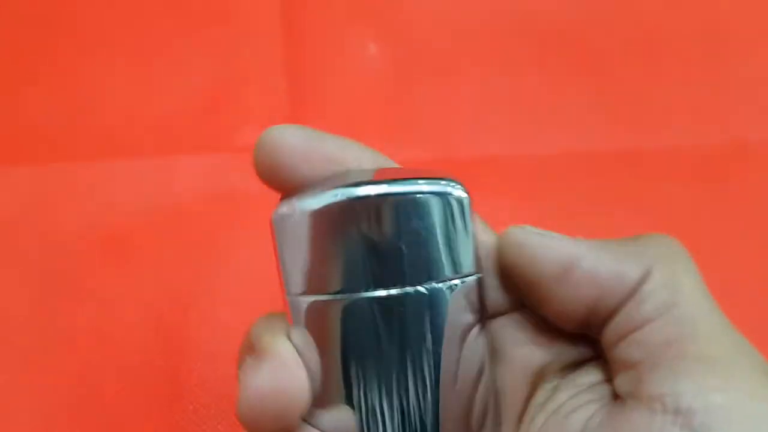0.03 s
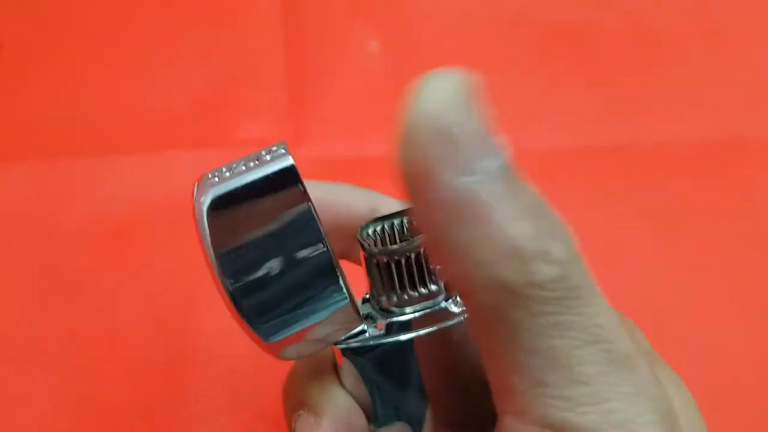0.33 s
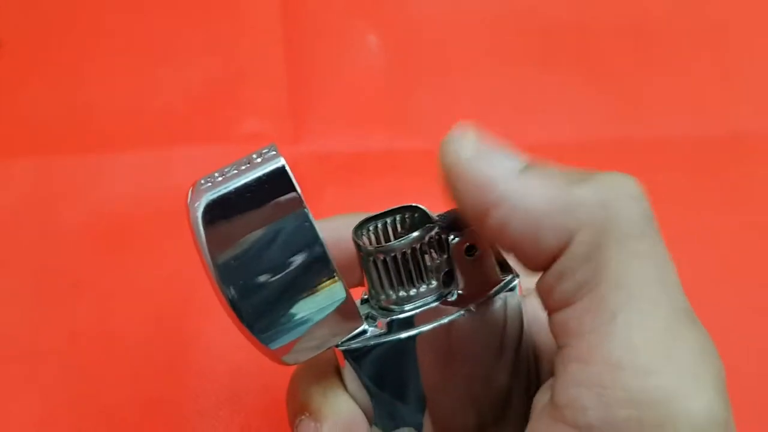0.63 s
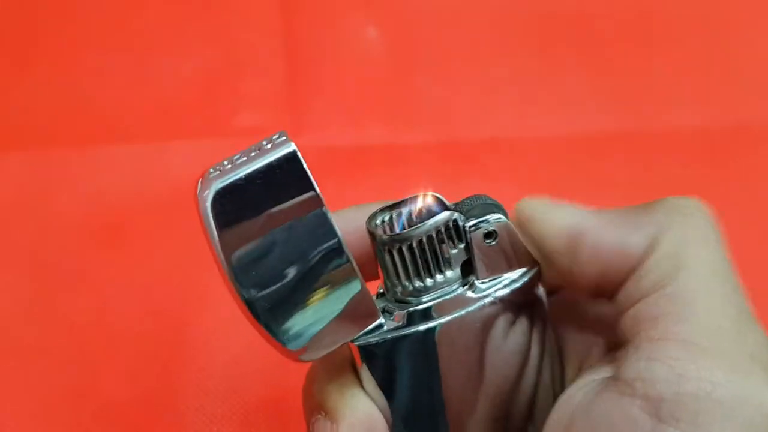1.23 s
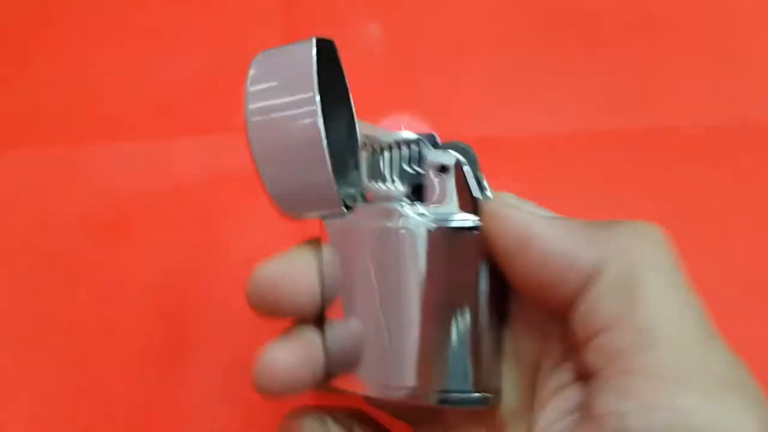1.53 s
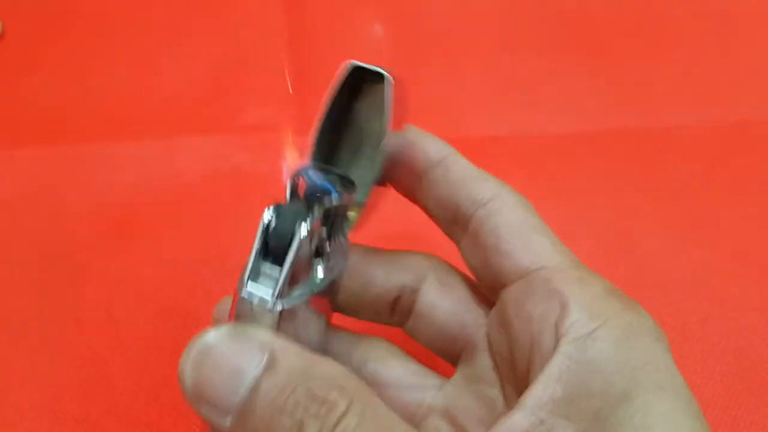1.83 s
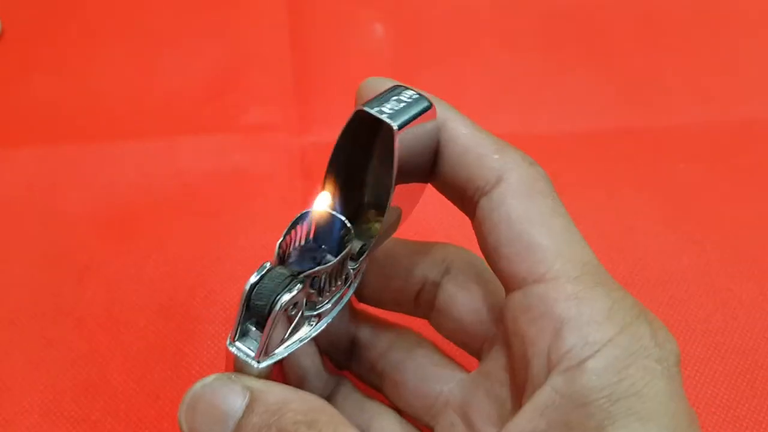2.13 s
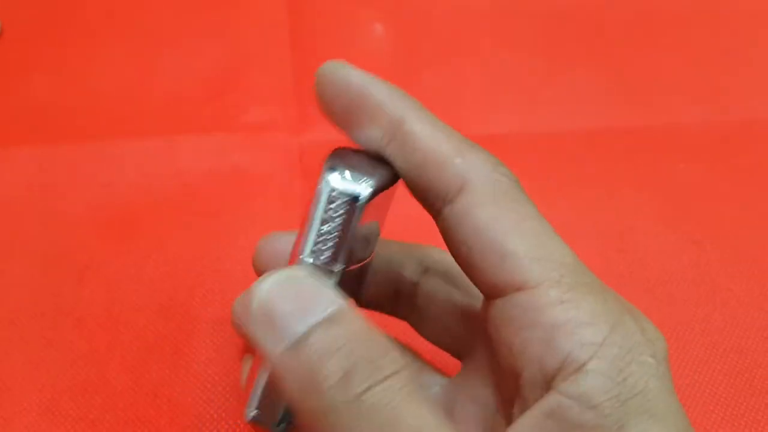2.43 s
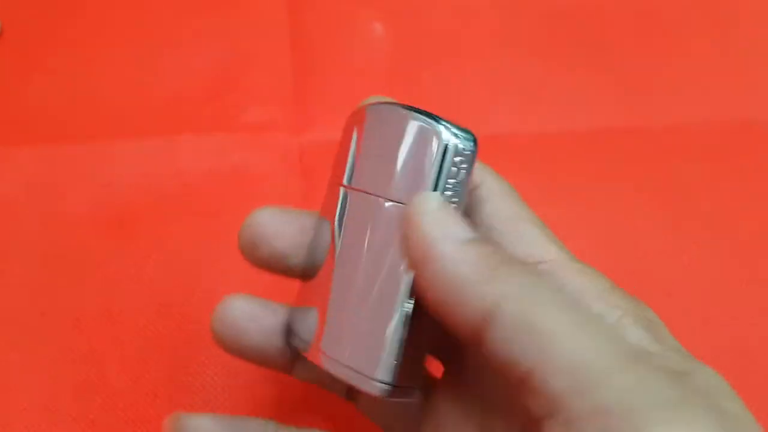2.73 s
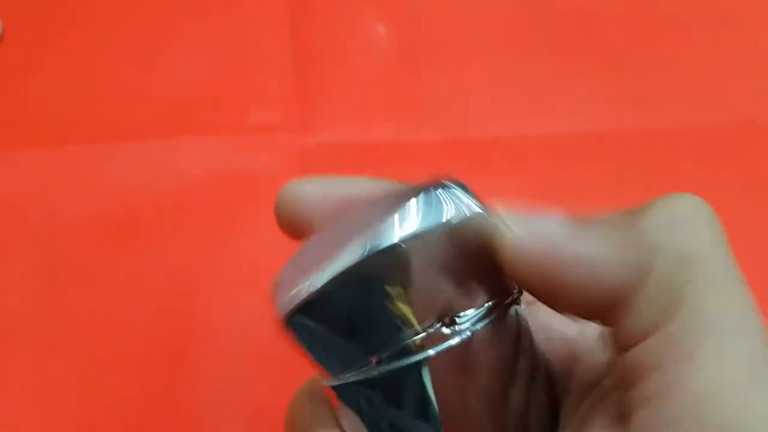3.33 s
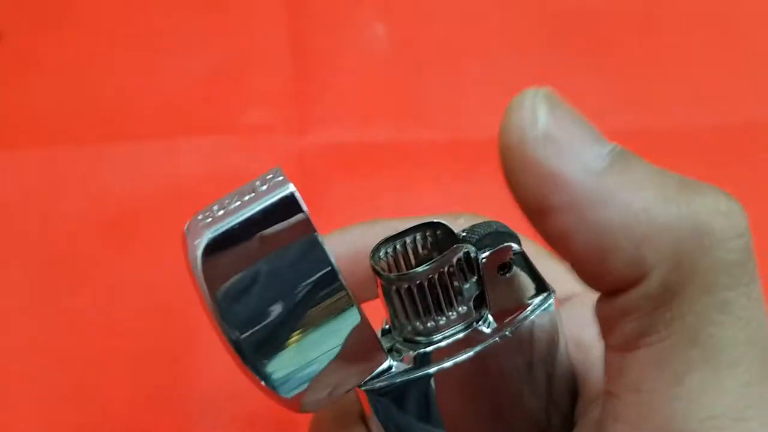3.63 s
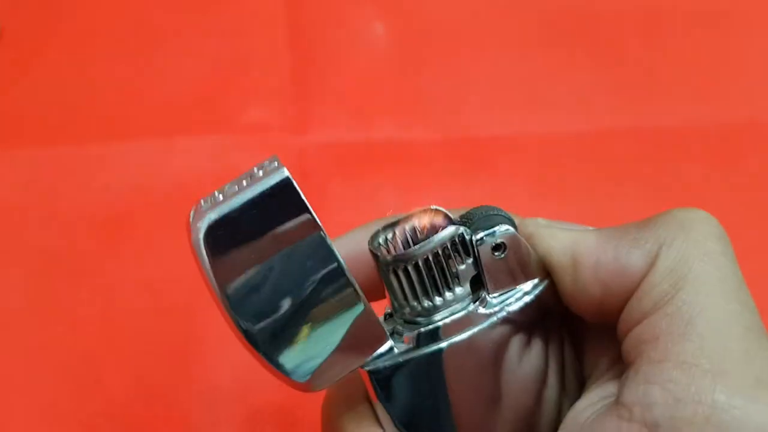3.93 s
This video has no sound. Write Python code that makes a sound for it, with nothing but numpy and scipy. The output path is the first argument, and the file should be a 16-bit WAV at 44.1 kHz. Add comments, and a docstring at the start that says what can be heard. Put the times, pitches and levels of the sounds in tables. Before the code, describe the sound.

A metal lighter clinks open, is struck, snaps shut, then is opened and struck again.

```python
"""A metal lighter, handled close to the left microphone in a small, humming room.
At 0.3 s the lid clinks open, shell ringing and cam rattling; at 0.8 s the wheel rasps on the flint.
A faint whine passes far off and fingers rub the case while the recorder's gain creeps up, lifting
the room's rumble, hum and hiss. At 2.3 s the lid snaps shut into the limiter and the gain ducks.
At 3.5 s the lid opens again; at 3.8 s the wheel is struck harder, and the distant whine returns."""
import sys
import numpy as np
from scipy import signal
from scipy.fft import rfft, irfft
from scipy.io import wavfile
from scipy.ndimage import uniform_filter1d, minimum_filter1d

SR = 44100
rng = np.random.default_rng(int(sys.argv[2]) if len(sys.argv) > 2 else 0)


def output_pcm(signal):
    """Save a mono or channel-first signal as 16-bit PCM at the path in sys.argv[1].

    Samples are clipped to [-1, 1] before scaling.
    """
    pcm = np.clip(np.atleast_2d(signal).T, -1, 1) * 32767
    wavfile.write(sys.argv[1], SR, np.round(pcm).astype(np.int16))


N = 176400

# The lid slams on the case and bounces. Each row: start in seconds, level in dB.
LID_BLOWS = [(2.3325, 23.5), (2.3349, 11), (2.336, 11)]
# Colour of the closed case. Each row: frequency in Hz, relative level in dB.
CASE_COLOUR = [(200, -29), (1500, -29.5), (2700, -31.5), (4000, -29), (5500, -16.5), (6700, -22),
               (7600, -21), (9000, -18), (10400, -16.5), (11000, -15), (11600, -6.5), (12500, -3),
               (13300, 0), (13950, -33), (14400, -4.5), (15200, -28), (16000, -40)]
# The lid flips open. Each row: start in seconds, level in dB, ring against rattle in dB.
LID_FLIPS = [(0.3176, -7, -2.5), (3.465, -3.5, 3)]
# Modes of the open lid and case. Each row: frequency in Hz, level in dB, t60 in seconds.
LID_MODES = [(1588, -42, 0.074), (2700, -41, .05), (3146, -21, 0.074), (3494, -17, .055), (4560, -15, .025),
             (4820, -23.5, 0.05), (5060, -30.5, .03), (6120, -16.5, 0.035), (7680, -26, 0.033),
             (8790, -24, .05), (10800, -30.5, 0.07), (11660, -16, 0.077), (12000, -31, .16),
             (12285, -15.5, 0.071), (12800, -33, 0.17), (12810, -21, 0.1), (15115, -22.5, 0.083)]
# Colour of the sprung cam's rattle. Each row: frequency in Hz, relative level in dB.
CAM_COLOUR = [(200, -19.5), (1100, -36), (1450, -8), (2100, -11.5), (3300, 5), (3950, -10.5), (4700, -2.5),
              (5900, -4.5), (6700, -14.5), (7500, 1.5), (8100, -17), (8700, -6), (10200, -12), (11200, -34),
              (12150, 11), (13700, -13), (15100, -6.5), (16000, -35)]
# Strokes of the flint wheel. Each row: peak time, rise and fall in seconds, level in dB.
WHEEL_STROKES = [(0.771, 0.0071, 0.0077, -25.5), (3.7948, 0.0041, 0.005, -15.5),
                 (3.835, 0.0015, 0.00091, -17.5)]
# Single teeth catch on the flint. Each row: start in seconds, level in dB.
TOOTH_CATCHES = [(0.7428, -55), (0.758, -29), (0.7648, -29), (0.7706, -34), (0.778, -21), (0.7852, -31),
                 (0.8013, -38.5), (3.7928, -11.5), (3.7972, -9), (3.8021, -12), (3.8088, -22),
                 (3.8158, -23)]
# Colour of the flint. Each row: frequency in Hz, relative level in dB.
FLINT_COLOUR = [(300, -20), (1300, -23), (2500, -16), (4400, -19), (5700, -6), (7000, -10), (8600, -0.5),
                (10000, -4), (11800, 3), (12900, -4.5), (14100, -2), (15300, -14), (16000, -31)]
# The thumb nudges the lid. Each row: start in seconds, level in dB.
THUMB_NUDGES = [(0.2382, -54), (0.2455, -51), (0.2478, -42.5), (3.357, -42.5), (3.3685, -50), (3.374, -48),
                (3.384, -51)]
# Colour of the lid shifting on its catch. Each row: frequency in Hz, relative level in dB.
CATCH_COLOUR = [(1000, -26.5), (5000, -29.5), (9000, -16.5), (11500, -17.5), (12300, -2), (12850, 3),
                (13600, -14), (15500, -23)]
# The hinge creaks. Each row: start and length in seconds, pitch in Hz, level in dB.
HINGE_CREAKS = [(0.231, 0.013, 1800, -55), (0.277, .008, 5200, -56), (2.3203, 0.0045, 3100, -31),
                (2.323, .005, 5000, -44), (3.358, 0.0066, 1800, -33.5)]
# Fingers rub the case. Each row: start and length in seconds, centre and width in Hz, level in dB.
FINGER_RUBS = [(0.192, .04, 4620, 2000, -71.5), (1.413, 0.077, 7400, 3000, -74),
               (1.703, 0.19, 6320, 250, -66), (1.757, 0.066, 6600, 3000, -63),
               (2.212, 0.029, 6490, 1000, -47)]

# Colour of the room noise. Each row: frequency in Hz, relative level in dB.
AIR_COLOUR = [(20, -15), (34, -7.5), (48, 3), (70, 5), (90, -7), (140, -2.5), (190, -1.5), (250, -7.5),
              (400, -9.5), (600, -12), (900, -11), (1400, -21), (2000, -22.5), (3200, -25.5), (4500, -28),
              (6000, -29.5), (7300, -38.5), (8400, -40.5), (9800, -37.5), (13500, -39), (15500, -47)]
# How alike that noise is at the two microphones. Each row: frequency in Hz, correlation.
AIR_CORRELATION = [(35, 0.91), (70, 1), (150, 0.88), (350, 0.77), (700, 0.38), (1500, 0.067),
                   (10000, 0.061)]
# Its lean to the left microphone. Each row: frequency in Hz, left minus right in dB.
AIR_BALANCE = [(50, 1.5), (400, 0), (1200, 0.5), (4000, 4), (7000, 6.5), (10000, 10), (15000, 5)]
# The recorder's gain on the room noise, a set curve that creeps up and ducks at the snap.
# Each row: time in seconds, then gain of rumble, bass, middle and treble in dB.
RECORDER_GAIN = [(0, -14, -10, -12, -17), (.45, -11, -9.5, -10.5, -13), (.7, -17, -2.5, -10, -11.5),
                 (1.43, -9, -3.5, -6.5, -12), (1.49, 2.5, 0.5, -4.5, -7.5), (1.83, 1, 2, 5, 2),
                 (2.05, 10, 9.5, 8.5, 5), (2.312, 10, 14.5, 13, 11), (2.37, 0, -3, 2, -2),
                 (2.62, -6, 0.5, 1.5, -1), (2.75, -7, 4.5, 3, 0.5), (2.82, 0, 0, 3.5, 1),
                 (3.15, -3, 1, 2.5, 4), (3.7, 1, 0, 3.5, 2), (4, 4.5, 0.5, 2.5, -0.5)]
# Centres of rumble, bass, middle and treble in Hz.
BAND_CENTRES = [60, 140, 650, 3500]
# A machine hums in the room. Each row: pitch in Hz, first and last level in dB before the gain.
HUM_TONES = [(55.4, -58, -53), (92.7, -50, -61.5), (115.8, -50.5, -51), (136.8, -43.5, -56),
             (187.5, -54, -55), (394, -62.5, -69), (836, -70.5, -67), (991, -77, -71.5)]
# A faint whine far off. Each row: start and length in seconds, pitch in Hz, level in dB.
WHINE_TONES = [(0.852, 0.63, 1975, -78), (0.901, .5, 1585, -78), (1.05, 0.42, 1180, -75),
               (3.89, 0.15, 1975, -62), (3.888, .2, 1585, -64)]
# Decay of the room. Each row: frequency in Hz, t60 in seconds.
ROOM_DECAY = [(300, 0.27), (3000, 0.81), (5500, .72), (8000, 0.72), (12000, 0.49), (15500, 0.51)]
# Colour of the reverberation. Each row: frequency in Hz, relative level in dB.
TAIL_COLOUR = [(1000, 7), (3300, 0), (5500, -1), (9000, -3), (12200, 1), (15000, 3)]
# Early echoes. Each row: delay in seconds, level against the tail in dB.
EARLY_ECHOES = [(.0125, -8.5), (.0138, -13), (.0252, -7), (.0278, -13)]


def lid_shuts(spread_s=0.0011):
    """The lid hits the rim and bounces; the closed case answers with a bright, short crack."""
    t = np.arange(0, spread_s, 1 / SR)
    # The thin shell spreads each blow in time, low notes first.
    sweep = np.cos(np.pi * SR / 2 * t ** 2 / spread_s)
    blows = knocks(LID_BLOWS, t60=0.015, rough=0.04)
    spread = signal.oaconvolve(blows, sweep / np.linalg.norm(sweep))[:N]
    return colour(spread, CASE_COLOUR)


def thump(hz=57.5, db=-27.5, length_s=0.026):
    """The slam gives the hand a low push, alike at both microphones."""
    out, t = np.zeros(N), np.arange(0, length_s, 1 / SR)
    push = -amp(db) * np.sin(np.pi * t / length_s) ** 2
    add(out, LID_BLOWS[0][0], push * np.sin(2 * np.pi * hz * t))
    return out


def lid_opens(rattle_db=-12.5, rattle_t60=0.1, rest_s=0.028):
    """The cam throws the lid open: the shell rings while the cam rattles to rest."""
    out, t = np.zeros(N), np.arange(SR // 4) / SR
    for start, db, ring_db in LID_FLIPS:
        ring = sum(amp(level - 60 * t / t60) * np.sin(2 * np.pi * (hz * t + rng.random()))
                   for hz, level, t60 in LID_MODES)
        fade = amp(rattle_db - 60 * t / rattle_t60) / (1 + (t / rest_s) ** 8)
        rattle = colour(fade * grit(len(t), per_s=7100, spread_db=5), CAM_COLOUR)
        add(out, start, amp(db) * (amp(ring_db) * ring + rattle))
    return out


def flint_wheel():
    """The wheel grinds the flint in a rasp that rises and dies; single teeth snap through."""
    t = np.arange(N) / SR
    force = sum(amp(db) * np.exp(-np.maximum((peak - t) / rise, (t - peak) / fall))
                for peak, rise, fall, db in WHEEL_STROKES)
    rasp = force * grit(N, per_s=5100, spread_db=5)
    return colour(rasp + knocks(TOOTH_CATCHES, t60=0.0018), FLINT_COLOUR)


def hinge(waver=0.067):
    """The lid ticks on its catch and creaks briefly as it starts to move."""
    out = colour(knocks(THUMB_NUDGES, t60=0.017), CATCH_COLOUR)
    for start, length, hz, db in HINGE_CREAKS:
        t = np.arange(0, length, 1 / SR)
        pitch = hz * (1 + waver * drift(SR // 4, hz=600)[:len(t)])
        add(out, start, amp(db) * np.sin(np.pi * t / length) * tone(pitch))
    return out


def fingers():
    """Skin slides on the polished case with a faint, narrow hiss."""
    out = np.zeros(N)
    for start, length, hz, width_hz, db in FINGER_RUBS:
        t = np.arange(0, length, 1 / SR)
        slip = drift(SR, width_hz / 2) + 1j * drift(SR, width_hz / 2)
        hiss = (slip[:len(t)] * np.exp(2j * np.pi * hz * t)).real
        add(out, start, amp(db) * np.sin(np.pi * t / length) * hiss)
    return out


def room_noise(base_db=-48):
    """The room's rumble, hum and hiss, lifted and ducked band by band by the recorder's gain."""
    t, hz = np.arange(N) / SR, np.fft.rfftfreq(N, 1 / SR)
    times, *levels = np.transpose(RECORDER_GAIN)
    gains = [amp(np.interp(t, times, level)) for level in levels]
    left, independent = rfft(rng.standard_normal((2, N))) * amp(read(AIR_COLOUR, hz))
    alike = np.clip(read(AIR_CORRELATION, hz), -1, 1)
    right = alike * left + np.sqrt(1 - alike ** 2) * independent
    pair = np.array([left, right]) * amp(np.outer([0.5, -0.5], read(AIR_BALANCE, hz)))
    pair *= amp(base_db) / np.std(irfft(pair.mean(0), N))
    bands = [read(list(zip(BAND_CENTRES, weights)), hz) for weights in np.eye(len(gains))]
    air = sum(gain * irfft(pair * band, N) for gain, band in zip(gains, bands))
    return air + gains[1] * machine_hum()  # the hum takes the bass gain


def machine_hum(flutter_db=3, waver_hz=0.98):
    """A machine in the room hums; each tone wavers slowly in level and pitch."""
    out = np.zeros(N)
    for hz, first_db, last_db in HUM_TONES:
        level = np.linspace(first_db, last_db, N) + flutter_db * drift(N, hz=1.1)
        out += amp(level) * tone(hz + waver_hz * drift(N, hz=3))
    return out


def distant_whine():
    """Thin tones of steady pitch fade in and out far from the microphones."""
    out = np.zeros(N)
    for start, length, hz, db in WHINE_TONES:
        t = np.arange(0, length, 1 / SR)
        fade = np.sqrt(abs(np.sin(np.pi * t / length)))
        add(out, start, amp(db) * fade * np.sin(2 * np.pi * hz * t))
    return out


def room_response(onset_s=0.0078, right_db=-6.5):
    """The small room at both microphones: a few echoes and a tail that dies band by band."""
    hz, t, noise = signal.stft(rng.standard_normal((2, SR)), SR, nperseg=256)
    decay = amp(read(TAIL_COLOUR, hz)[:, None] - 60 * t / read(ROOM_DECAY, hz)[:, None])
    tail = signal.istft(noise * decay, SR, nperseg=256)[1]
    tail *= np.clip(np.arange(tail.shape[1]) / SR / onset_s, 0, 1) ** 4
    tail /= np.linalg.norm(tail[0])
    for channel in tail:
        for delay, db in EARLY_ECHOES:
            add(channel, delay + rng.uniform(0, 0.00016), amp([db]))
    return tail * amp([[0], [right_db]])


def near_left_mic(x, right_db, room_db, lag_s=0.00018):
    """The left microphone hears a source directly, the right one later, shaded and scattered."""
    t = np.arange(SR // 100) / SR
    path = 0.043 * rng.standard_normal(len(t)) * np.exp(-t / 0.00055)
    add(path, lag_s, np.ones(1))
    right = amp(right_db) * signal.oaconvolve(x, path / np.linalg.norm(path))[:N]
    reverb = signal.fftconvolve(x[None], room_response(), axes=1)[:, :N]
    return np.array([x, right]) + amp(room_db) * reverb


def knocks(rows, t60, rough=1):
    """Short contacts: a sharp blow and a rough burst that dies at once."""
    out, t = np.zeros(N), np.arange(SR // 20) / SR
    for start, db in rows:
        burst = np.where(t > 0, rough * rng.choice([-1, 1], len(t)), 1)
        add(out, start, amp(db - 60 * t / t60) * burst)
    return out


def grit(size, per_s, spread_db):
    """Dense tiny impacts of random sign and strength."""
    hits = (rng.random(size) < per_s / SR) * rng.choice([-1, 1], size)
    return unit(hits * amp(spread_db * np.minimum(rng.exponential(1, size), 4)))


def drift(size, hz):
    """Smooth random motion up to about the given rate."""
    lowpass = np.exp(-(np.fft.rfftfreq(size, 1 / SR) / hz) ** 2)
    return unit(irfft(rfft(rng.standard_normal(size)) * lowpass, size))


def colour(x, points):
    """Minimum-phase filter of unit energy with the given spectrum."""
    log_gain = np.log(amp(read(points, abs(np.fft.fftfreq(2048, 1 / SR)))))
    taps = np.fft.ifft(np.exp(np.conj(signal.hilbert(log_gain)))).real[:1024]
    return signal.oaconvolve(x, taps / np.linalg.norm(taps))[:len(x)]


def tone(hz):
    """A sine that follows a moving pitch."""
    return np.sin(2 * np.pi * np.cumsum(hz) / SR)


def read(points, hz):
    """Reads a spectrum table on a log-frequency axis."""
    f, value = np.transpose(points)
    return np.interp(np.log(hz + 1), np.log(f + 1), value)


def add(mix, start, sound):
    """Mixes a sound in at a start in seconds."""
    part = mix[round(start * SR):][:len(sound)]
    part += sound[:len(part)]


def amp(db):
    """Decibels to gain."""
    return 10 ** (np.asarray(db) / 20)


def unit(x):
    """Scales to an rms of one."""
    return x / np.sqrt(np.mean(x ** 2) + 1e-20)


def scene():
    """The lighter close up on the left, the room behind it."""
    return (near_left_mic(lid_opens(), right_db=-14, room_db=-18)
            + near_left_mic(lid_shuts(), right_db=-13.5, room_db=-12)
            + near_left_mic(flint_wheel(), right_db=-21, room_db=-21)
            + near_left_mic(hinge(), right_db=-23.5, room_db=-12.5)
            + near_left_mic(fingers(), right_db=-13, room_db=-1.5)
            + thump() + room_noise() + distant_whine())


def record(dry, lookahead_s=0.0041, release_db_per_s=901, cutoff_hz=16300):
    """The recorder's look-ahead limiter holds peaks to full scale; a low-pass follows."""
    ahead = round(lookahead_s * SR)
    over_db = np.maximum(20 * np.log10(abs(dry).max(0) + 1e-9), 0)
    held_db = -minimum_filter1d(-over_db, 2 * ahead)
    release = np.arange(N) * release_db_per_s / SR
    cut_db = np.maximum.accumulate(held_db + release) - release
    limited = dry * amp(-uniform_filter1d(cut_db, ahead))
    lowpass = signal.firwin(255, cutoff_hz, window=("kaiser", 8), fs=SR)
    return signal.oaconvolve(limited, lowpass[None], "same")


dry = scene()
out = record(dry)
output_pcm(out)
```